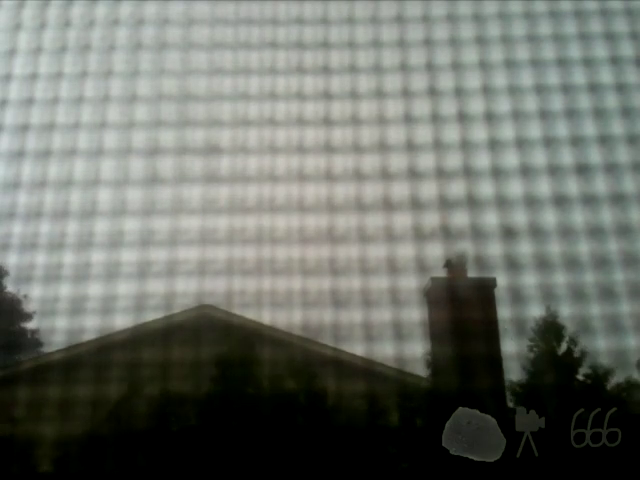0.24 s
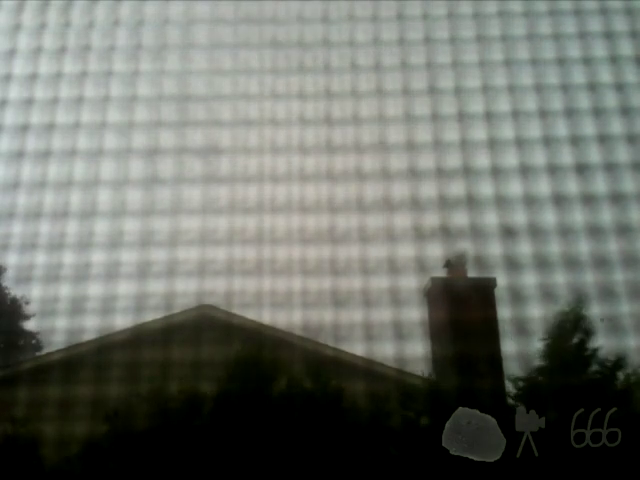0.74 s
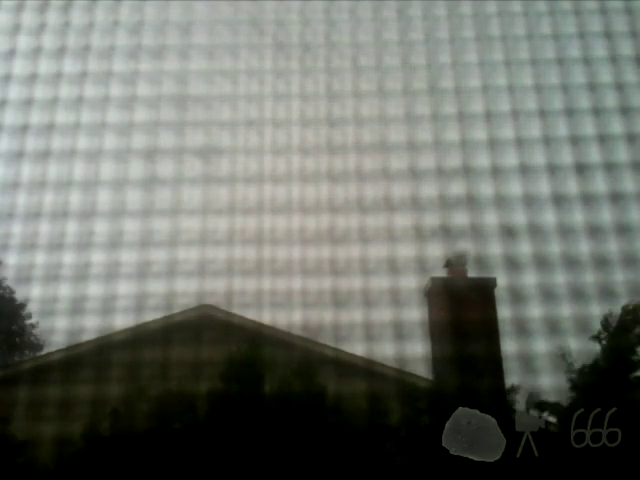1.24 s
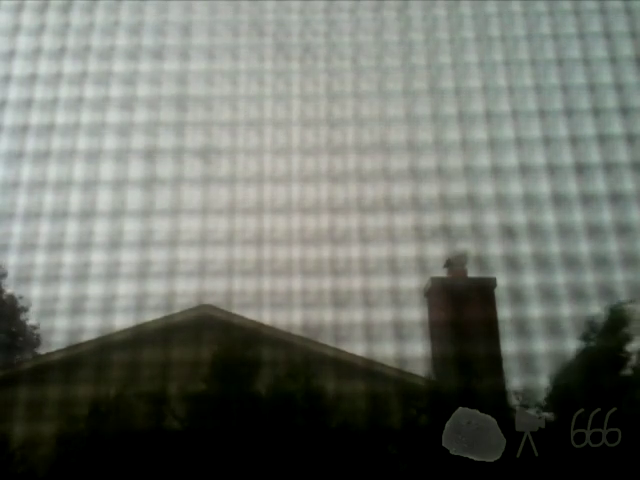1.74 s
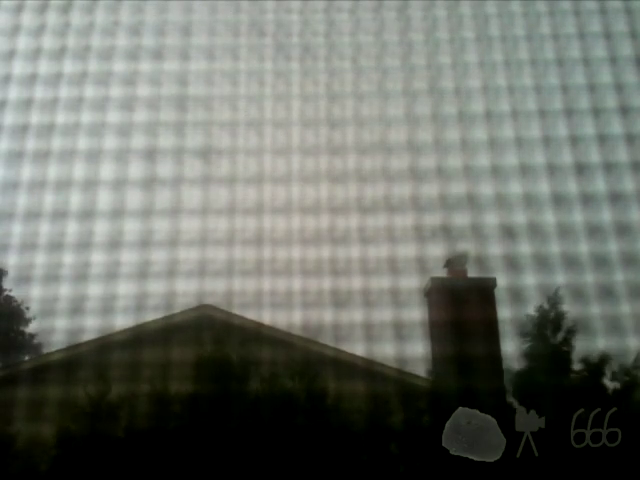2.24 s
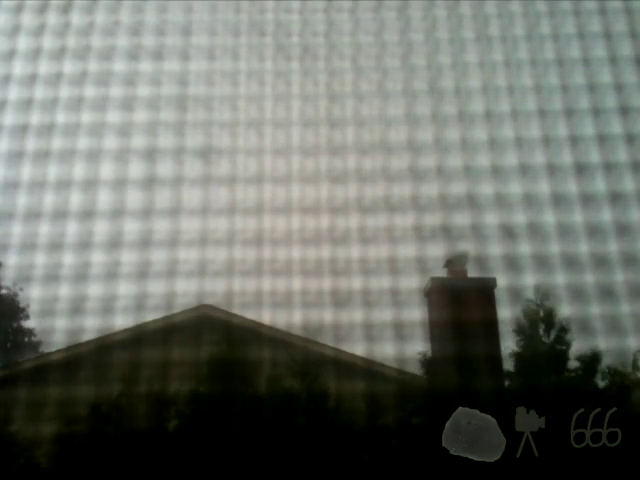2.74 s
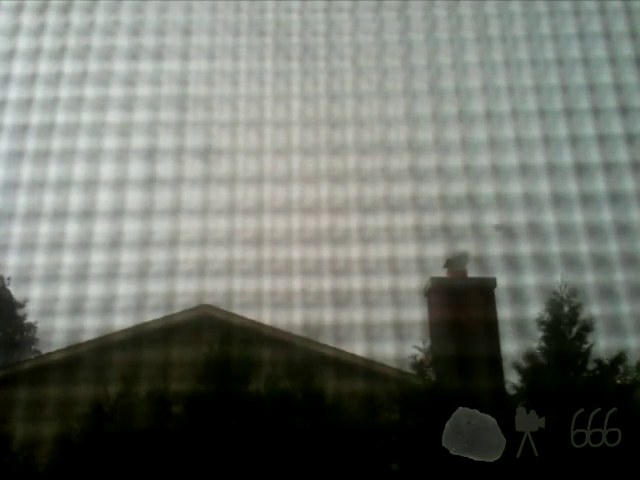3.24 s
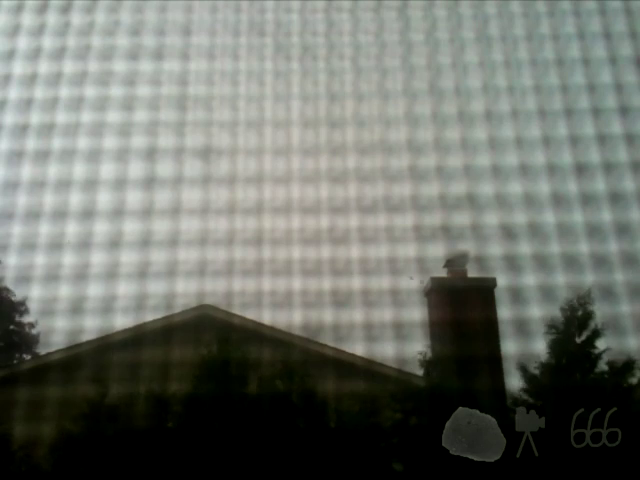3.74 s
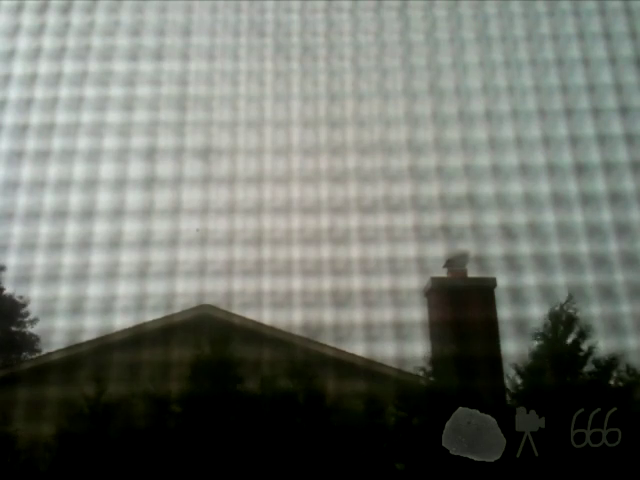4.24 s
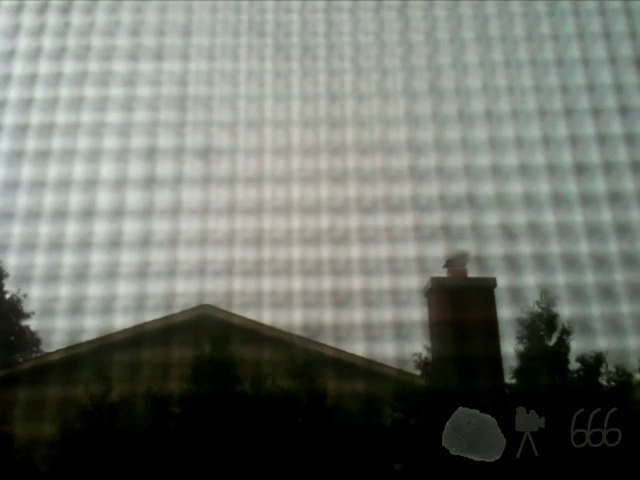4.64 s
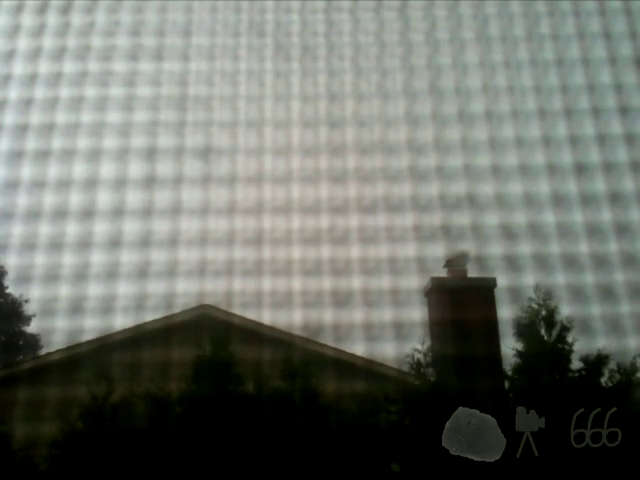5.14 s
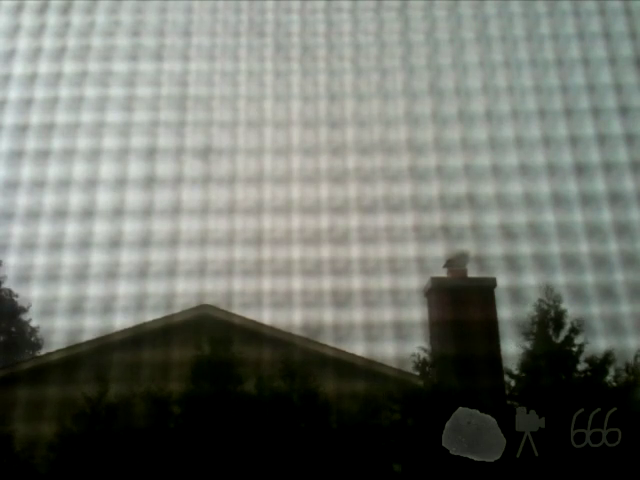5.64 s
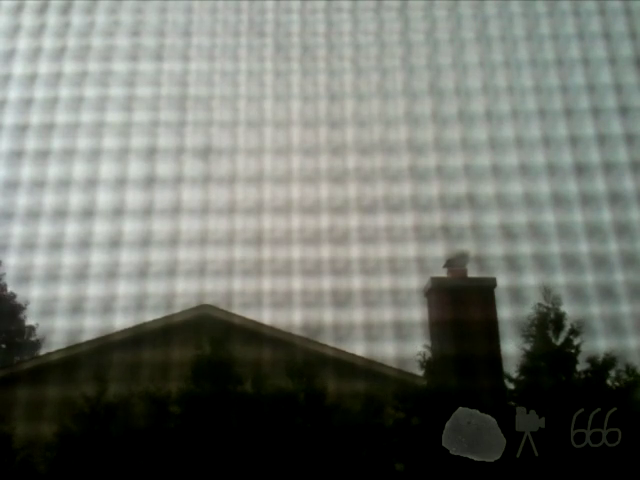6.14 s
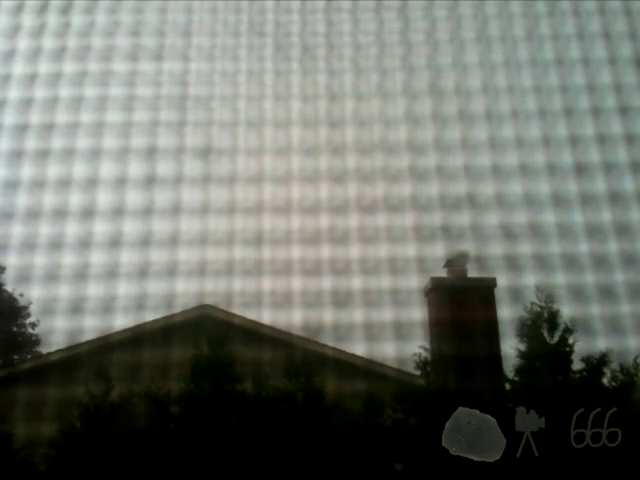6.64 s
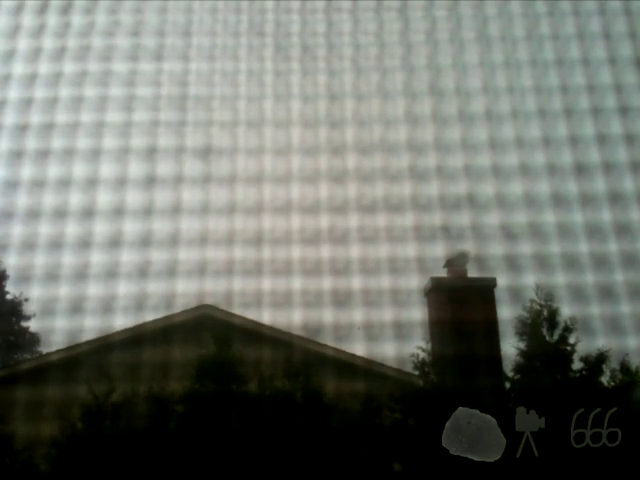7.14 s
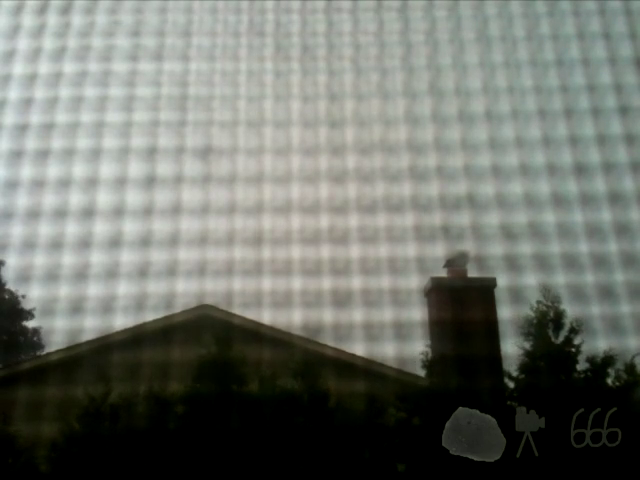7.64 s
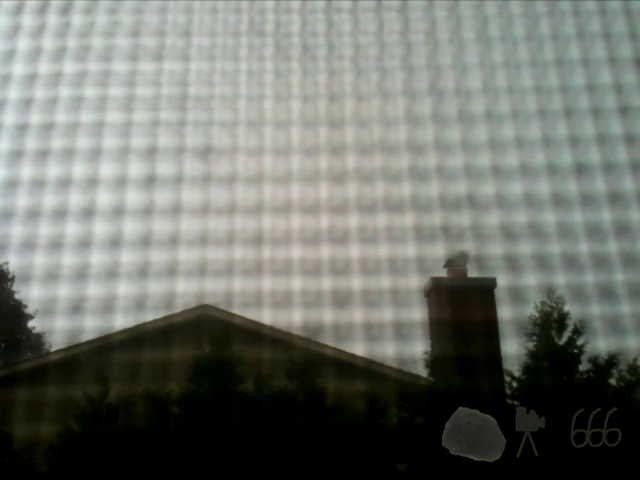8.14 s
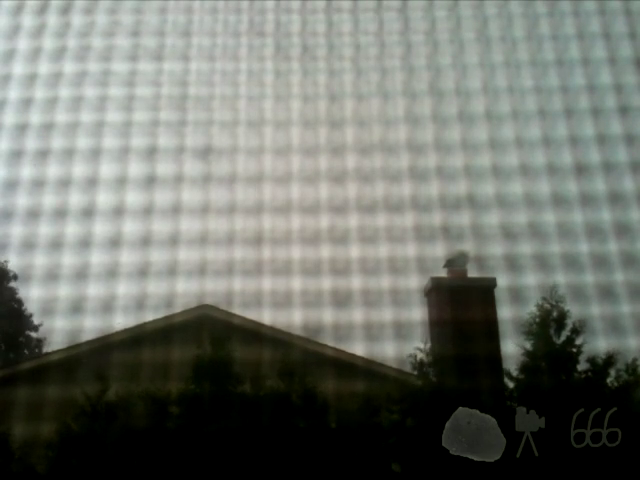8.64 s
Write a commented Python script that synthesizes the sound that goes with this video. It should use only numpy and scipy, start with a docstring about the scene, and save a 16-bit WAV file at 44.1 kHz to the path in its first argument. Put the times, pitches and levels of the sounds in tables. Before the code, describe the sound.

Steady dense rain hisses over wind roaring in trees, a few tiny drops tick on a window screen, then distant thunder rolls in low peals.

```python
"""A thunderstorm at a screened window, the same sound in both channels.
From the start, wind rumbles and roars in trees (drifting filtered noise) and dense rain hisses on roofs
and leaves (noise with a grain of impulses). From 0.26 s five drops tick on the screen (decaying modes).
From 4.5 s far thunder rolls in several peals: filtered noise and impulses under clap and echo envelopes."""
import sys
import numpy as np
from scipy import signal
from scipy.fft import rfft, irfft, next_fast_len
from scipy.io import wavfile
from scipy.ndimage import uniform_filter1d, map_coordinates

SR = 44100
rng = np.random.default_rng(int(sys.argv[2]) if len(sys.argv) > 2 else 0)


def store_wav(level_fs):
    """Save 16-bit WAV to argv[1]."""
    pcm = np.round(np.clip(np.atleast_2d(level_fs), -1, 1) * 32767)
    wavfile.write(sys.argv[1], SR, pcm.T.astype(np.int16))


N = 392931

# Thunder claps: onset t/s, rise t/s, hold t/s, boom level/dB,
# crackle level relative to boom/dB, deepest rumble level relative to boom/dB
CLAPS = [(4.479, 0.013, .02, -31, -3, -30), (4.546, 0.13, 0.043, -29.5, 1.5, -28),
         (4.774, .04, 0.066, -30, -5, -24), (4.865, 0.036, 0.047, -25.5, 0, -26),
         (4.962, 0.016, 0.034, -24.5, -1.5, -28), (5.055, 0.022, 0.027, -26, -1.5, -28),
         (5.135, .01, .02, -36, -4, -23), (5.66, .04, 0.069, -37, -4, -18),
         (5.815, 0.037, .04, -37.5, -2, -17), (6.38, .02, 0.039, -32, -10, -18),
         (6.547, 0.056, 0.063, -32.5, -5, -19), (6.733, 0.013, 0.017, -32, -2, -20),
         (7.058, .02, .02, -45, 3, -18), (7.5, 0.046, .08, -40, -5, -16),
         (7.695, 0.018, .03, -33.5, -3, -24), (7.761, .03, .06, -31.5, -3.5, -17),
         (7.867, .015, .03, -35.5, -11, -24), (8.008, 0.014, 0.015, -34, -13, -28),
         (8.48, .02, .03, -40.5, -4, -13)]
# Drops striking the screen: t/s, level/dB, extra level of the top mode/dB
SCREEN_DROPS = [(.2613, -34, -8), (.5237, -35, 7), (1.1183, -24, -22), (2.9855, -37, 0), (8.6715, -32, -8)]
# Resonant modes of the screen mesh: f/Hz, level/dB, 60 dB decay time t/s
SCREEN_MODES = [(5300, -6, .008), (6700, 0, .03), (7400, -4, .015), (8100, -2, .022), (12500, -6, .01)]
# Course of the storm: t/s, tree roar level/dB, rain level/dB
STORM_COURSE = [(0.0, -35, -36.5), (0.8, -34.5, -36.5), (1.5, -34.5, -37), (2.0, -34, -37), (3.1, -36, -38),
                (4.0, -35, -37.5), (4.8, -34, -35.5), (5.3, -34.5, -37), (5.7, -36, -38), (6.6, -35, -37.7),
                (7.1, -35.8, -38), (7.5, -34, -37.5), (7.9, -34.2, -36), (8.4, -33.5, -35.5),
                (8.91, -35.5, -36.5)]

# Spectral shapes, each later scaled to rms 1: f/Hz, relative level/dB
# Thunder: main boom, crackle above it, deepest rumble below it
BOOM_SPECTRUM = [(25, -42), (50, -44), (90, -43), (120, -1.5), (220, 3.5), (320, -6.5), (500, -46),
                 (900, -70)]
CRACKLE_SPECTRUM = [(200, -50), (320, 2.5), (420, 3), (600, -2), (850, -8), (1200, -26), (1800, -60)]
DEPTH_SPECTRUM = [(15, -50), (30, -17), (70, -10), (100, 12), (130, -12), (200, -45)]
# Rain: body of the hiss, and treble fizz
RAIN_SPECTRUM = [(1260, -42), (2150, -15.5), (2470, -4), (2740, -5.5), (2980, -2), (3540, -3), (4380, -8.5),
                 (4880, -8.5), (5980, -14), (6560, -12), (7000, -11.5), (9100, -28), (15400, -120)]
FIZZ_SPECTRUM = [(3820, -28), (6500, -5), (9240, -6), (10100, -11), (12900, -16), (13500, -16)]
# Wind: low rumble round the houses, and roar of the trees
LOW_WIND_SPECTRUM = [(15, -70), (30, -46), (65, -25), (90, -14.5), (140, -1.5), (200, 1.5), (300, 0.5),
                     (500, -6), (900, -69)]
TREES_SPECTRUM = [(120, -60), (250, -24.5), (400, -9), (560, -7.5), (810, -5), (1100, -7), (1450, -7.5),
                  (1750, -13.5), (2100, -24), (2600, -68)]

CLAP_T60_S = 0.34  # fall of a clap after its hold
ECHO_DB, ECHO_T60_S = -15, 7.2  # echoes rolling on after each clap
ECHO_CRACKLE_DB, ECHO_DEPTH_DB = -2, 1  # echoes lose crackle and keep the depth
FIZZ_DB, FIZZ_GROWS = -45.5, 1.4  # level at mean rainfall; dB of fizz per dB of rain
LOW_WIND_DB = -42
BAND_LIMIT_HZ = 13650


def thunder():
    """Superposition: shock fronts from each bend of a long far channel, scattered into noise on the way."""
    boom_gain, crackle_gain, depth_gain = clap_gains()
    fronts = impacts(per_s=400, spread_db=2.0) + 2.0 * rng.standard_normal(N)
    flutter = amp(0.53 * wobble(30))  # bends arrive in bunches
    boom = boom_gain * coloured(fronts, BOOM_SPECTRUM)
    crackle = crackle_gain * coloured(fronts, CRACKLE_SPECTRUM)
    depth = depth_gain * coloured(fronts, DEPTH_SPECTRUM)
    return flutter * (boom + crackle + depth)


def clap_gains():
    """Incoherent addition: claps and their decaying echoes add in power, for boom, crackle and depth."""
    power, t = np.zeros((3, N)), np.arange(N) / SR
    echo_balance = amp([[0], [ECHO_CRACKLE_DB], [ECHO_DEPTH_DB]])
    for onset_s, rise_s, hold_s, boom_db, crackle_db, depth_db in CLAPS:
        rise = np.clip((t - onset_s) / rise_s, 0, 1)
        after_s = np.maximum(t - onset_s - rise_s - hold_s, 0)
        clap = amp(-60 * after_s / CLAP_T60_S)
        echo = amp(ECHO_DB - 60 * after_s / ECHO_T60_S) * echo_balance
        strength = rise * amp(boom_db) * amp([[0], [crackle_db], [depth_db]])
        power += strength ** 2 * (clap ** 2 + echo ** 2)
    return np.sqrt(power)


def screen_drops():
    """Modal excitation: each near drop briefly rings the mesh; small hard drops reach its top mode."""
    out, t = np.zeros(N + SR), np.arange(SR // 20) / SR
    hz, mode_db, t60_s = np.transpose(SCREEN_MODES)[:, :, None]
    for onset_s, drop_db, bright_db in SCREEN_DROPS:
        # each strike excites the modes a little differently
        strength_db = mode_db + rng.normal(0, 1.5, hz.shape) + bright_db * (hz == hz.max())
        modes = amp(strength_db - 60 * t / t60_s) * np.sin(2 * np.pi * hz * t)
        # differenced noise: a treble tick that falls 60 dB in 5 ms
        tick = amp(bright_db + 1 - 60 * t / .005) * np.diff(rng.standard_normal(len(t) + 1))
        onset = 1 - np.exp(-t / .0003)
        out[round(onset_s * SR):][:len(t)] += amp(drop_db) * onset * (modes.sum(axis=0) + tick)
    return out[:N]


def rain(rain_db):
    """Dense random impacts: far drops blur into hiss; nearer ones leave a grain, most of all in the treble."""
    fizz_db = FIZZ_DB + FIZZ_GROWS * (rain_db - rain_db.mean())
    sheets = wobble(7)  # the fall comes in sheets, shared by both bands
    near = impacts(per_s=1500, spread_db=3)
    body = coloured(patchy(patchy_db=0.82) + 0.25 * near, RAIN_SPECTRUM)
    fizz = coloured(patchy(patchy_db=1.0) + 0.34 * near, FIZZ_SPECTRUM)
    return amp(rain_db + 0.17 * sheets) * body + amp(fizz_db + 0.27 * sheets) * fizz


def wind(trees_db):
    """Turbulent noise: air rumbling round the houses, and the roar of shaken trees."""
    low_db = LOW_WIND_DB + 0.57 * wobble(9) + 0.47 * wobble(1.94)
    low = amp(low_db) * coloured(patchy(patchy_db=1.84), LOW_WIND_SPECTRUM)
    roar_db = trees_db + 0.45 * wobble(10)
    roar = amp(roar_db) * coloured(patchy(patchy_db=0.1), TREES_SPECTRUM)
    return low + roar


def impacts(per_s, spread_db):
    """Random arrivals: scattered impulses of either sign, many small, some larger, up to a largest size."""
    chance, size, sign = rng.random(N), rng.exponential(size=N), rng.standard_normal(N)
    strength = amp(spread_db * np.minimum(size, 3.5))
    return unit((chance < per_s / SR) * strength * np.sign(sign))


def patchy(patchy_db):
    """Non-stationary noise: white, with gain drifting in small patches of time and frequency; rms 1."""
    z = signal.stft(rng.standard_normal(N), nperseg=512)[2]
    field = uniform_filter1d(rng.standard_normal(z.shape), size=7, axis=0)  # smooth over frequency
    field = uniform_filter1d(field, size=12, axis=1)  # smooth over time
    return unit(signal.istft(z * amp(patchy_db * unit(field)), nperseg=512)[1][:N])


def coloured(x, spectrum):
    """Spectral shaping: x filtered by levels interpolated along log frequency; rms 1."""
    f, db = np.transpose(spectrum)
    return unit(filtered(x, lambda hz: amp(np.interp(np.log(hz + 1), np.log(f), db))))


def filtered(x, response):
    """Linear filtering: the spectrum of x times a response of frequency."""
    m = next_fast_len(N + 8192)  # zero padding past the end
    return irfft(rfft(x, m) * response(np.fft.rfftfreq(m, 1 / SR)), m)[..., :N]


def wobble(rate):
    """Slow random modulation: a smooth curve through rate random knots a second, at most 60."""
    knots = rng.standard_normal(int(N / SR * 60) + 4)
    return map_coordinates(knots, [np.arange(N) * min(rate, 60) / SR])


def curves(rows):
    """Linear interpolation: one value per sample for each column after the time."""
    s, *cols = np.transpose(rows)
    return [np.interp(np.arange(N) / SR, s, c) for c in cols]


def unit(x):
    """Normalization to rms 1."""
    return x / np.sqrt(np.mean(x ** 2) + 1e-20)


def amp(db):
    """Logarithmic level: dB to amplitude gain."""
    return 10 ** (np.asarray(db) / 20)


def scene():
    """Linear superposition at one microphone, which feeds both channels."""
    trees_db, rain_db = curves(STORM_COURSE)
    mono = thunder() + screen_drops() + rain(rain_db) + wind(trees_db)
    return np.array([mono, mono])


def record(dry):
    """Band limitation: nothing passes from the band limit upwards."""
    return filtered(dry, lambda hz: hz < BAND_LIMIT_HZ)


dry = scene()
out = record(dry)
store_wav(out)
```